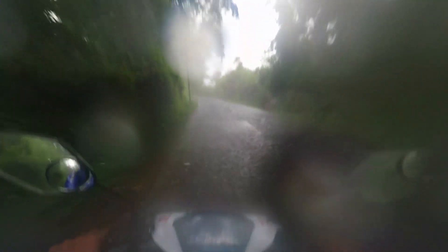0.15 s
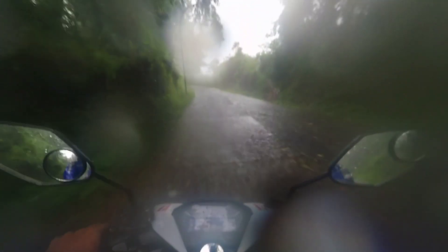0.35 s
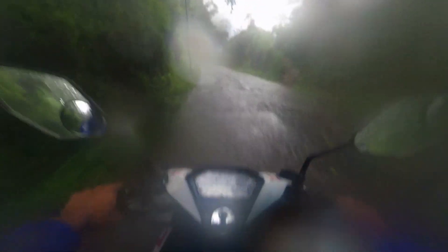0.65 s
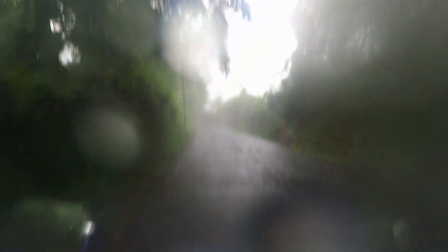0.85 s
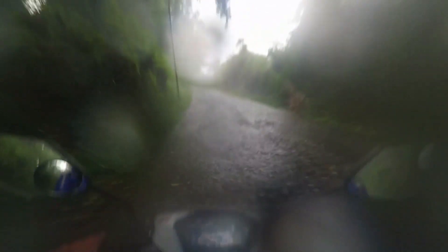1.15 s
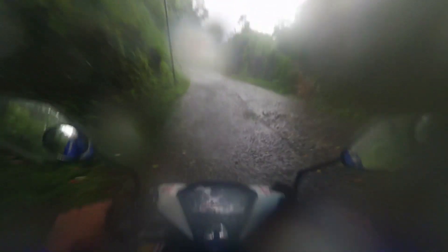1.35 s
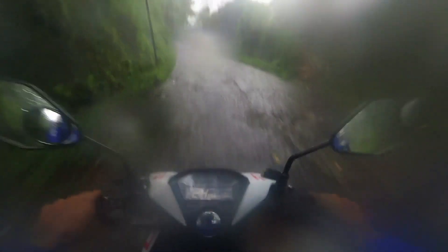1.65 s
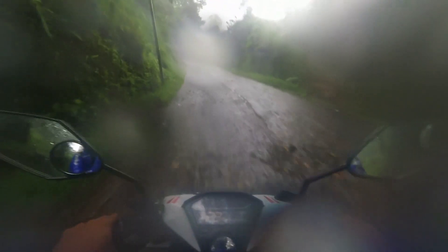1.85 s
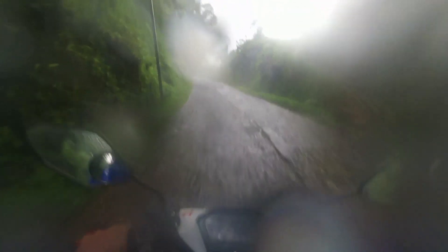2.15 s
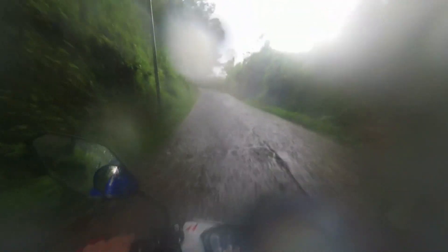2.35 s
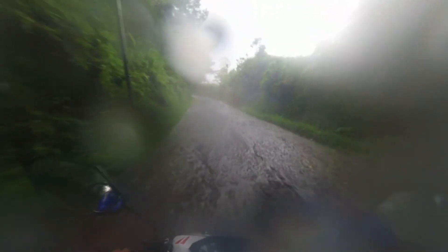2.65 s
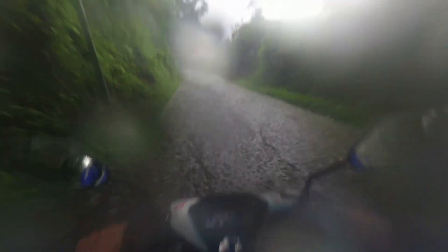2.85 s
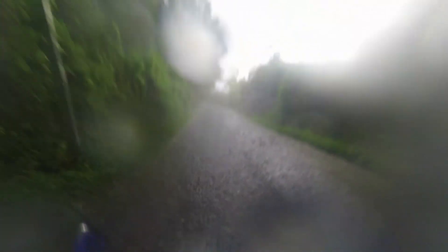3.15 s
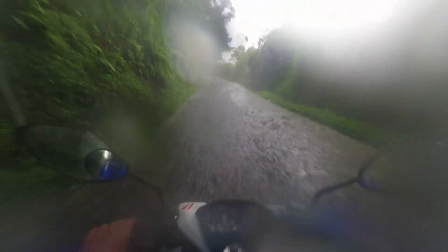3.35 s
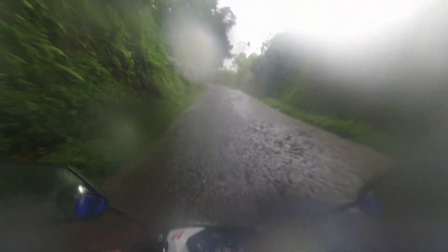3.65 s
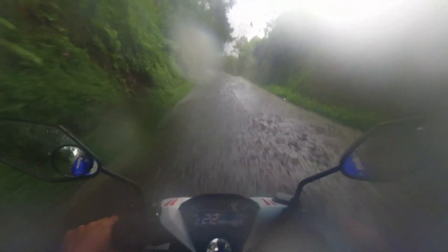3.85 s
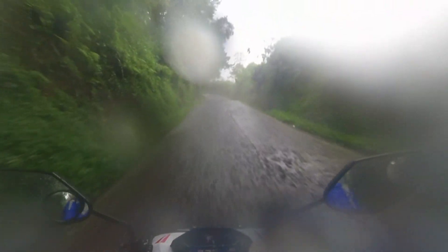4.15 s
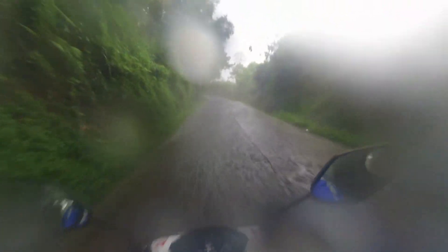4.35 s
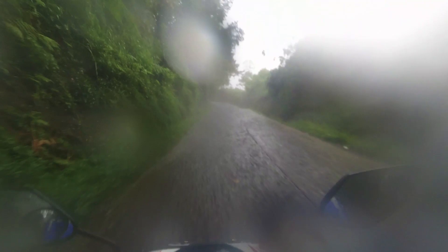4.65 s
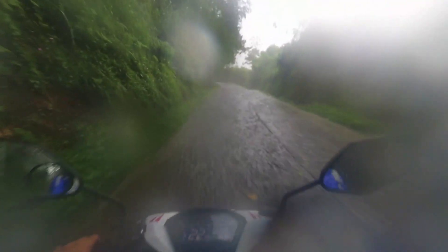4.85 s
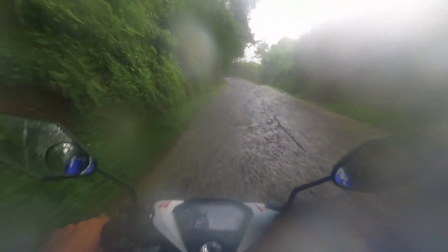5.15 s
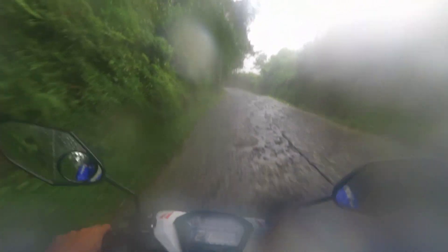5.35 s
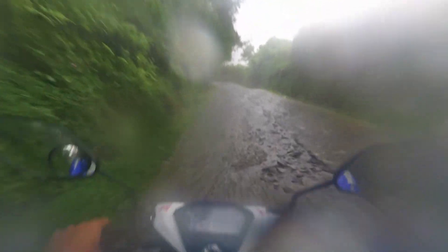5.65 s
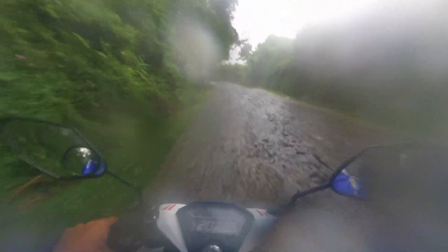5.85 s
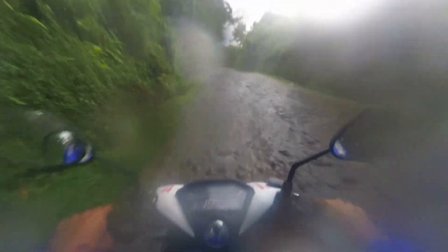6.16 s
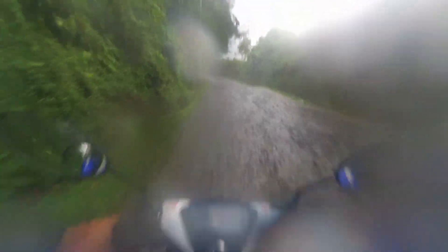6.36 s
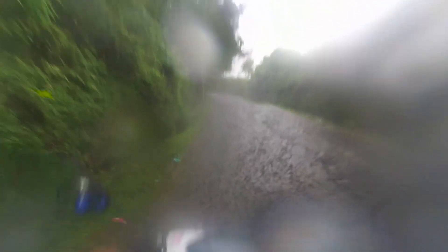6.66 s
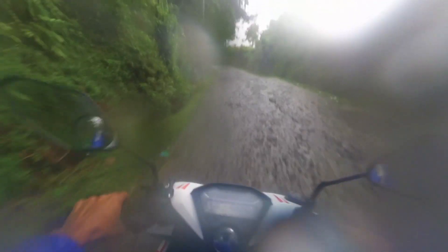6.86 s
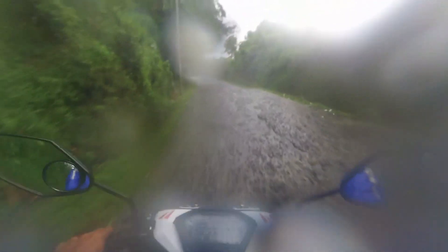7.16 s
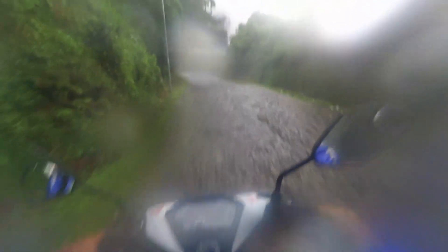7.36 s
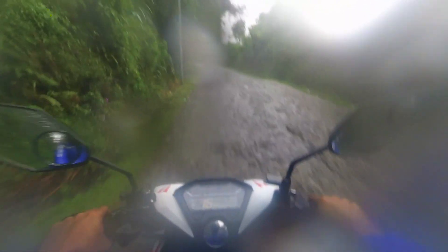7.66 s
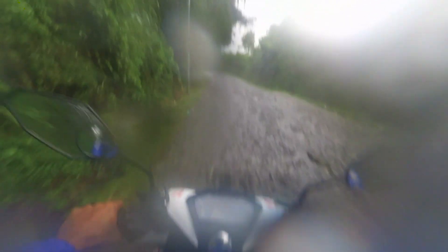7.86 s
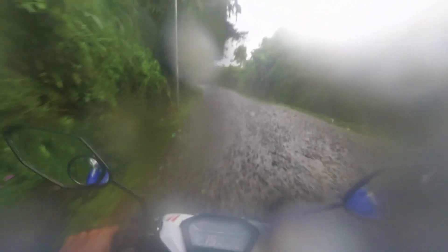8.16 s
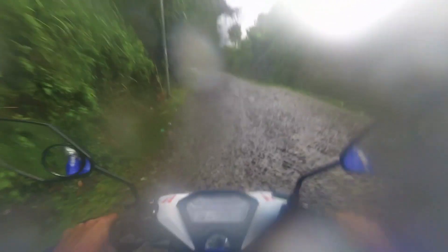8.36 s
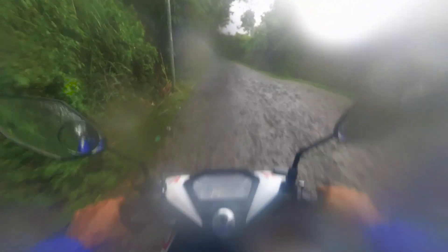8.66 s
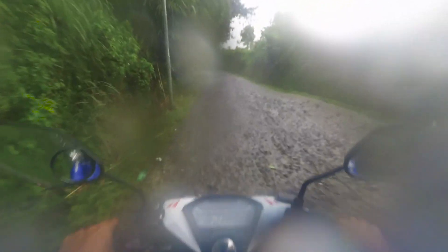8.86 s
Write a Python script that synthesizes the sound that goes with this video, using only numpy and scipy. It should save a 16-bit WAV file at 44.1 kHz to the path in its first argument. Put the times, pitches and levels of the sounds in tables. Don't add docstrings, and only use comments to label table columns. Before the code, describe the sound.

From 0 s a small single-cylinder motorcycle is already running, its low muffled exhaust thumping nearly thirty times a second, heard inside a sealed plastic housing in heavy rain. A sharp slap of water opens, then large drops crack and pop on the shell, clustered around 0.4-1.3 s, over fine ticking and thin spray hiss. Deep wind buffets swell around 1.2-1.9 s, with dull mount knocks at 1.9 and 2.1 s. Wind surges near 3-3.5 s, when the engine briefly ducks and recovers. Loud hollow drops strike around 4.4 s, a bump knocks at 4.8 s, and a busy cluster runs to 5.8 s. From about 6 s the engine beat gradually slows and deepens. Wind gusts and quick drops return at 7-7.6 s with soft bumps; the hiss thins, sparser drops continue, and a last low knock comes near 8.8 s as the engine sinks to about twenty-one beats a second.

```python
import sys
import numpy as np
from scipy import signal
from scipy.fft import rfft, irfft
from scipy.io import wavfile
from scipy.ndimage import uniform_filter1d, minimum_filter1d

SR = 44100
rng = np.random.default_rng(int(sys.argv[2]) if len(sys.argv) > 2 else 0)


def voltage_ratio(decibels):
    exponent = np.asarray(decibels, float) / 20
    return 10 ** exponent


def log_audio(samples):
    frames = np.atleast_2d(samples).T
    limited = np.clip(frames, -1, 1)
    pcm = np.round(limited * 32767).astype(np.int16)
    wavfile.write(sys.argv[1], SR, pcm)


N = 396900
TIME_S = np.arange(N) / SR


def unit_rms(x):
    return x / np.sqrt(np.mean(x ** 2) + 1e-20)


def read_spectrum(points, hz):
    point_hz, value = np.transpose(points)
    return np.interp(np.log(hz + 1), np.log(point_hz + 1), value)


def curves(rows):
    start_s, *columns = np.transpose(rows)
    return [np.interp(TIME_S, start_s, column) for column in columns]


def humps(rows):
    return sum(voltage_ratio(level_db) * np.exp(-(2 * (TIME_S - centre_s) / length_s) ** 2)
               for centre_s, length_s, level_db in rows)


def white():
    return rng.standard_normal(N)


def drift(hz):
    knots = rng.standard_normal(4000)
    return np.interp(TIME_S * hz, np.arange(4000), knots)


def coloured(x, points):
    gain = voltage_ratio(read_spectrum(points, np.fft.rfftfreq(len(x), 1 / SR)))
    return irfft(rfft(x) * gain, len(x))


def response(points, size=8192):
    level_db = read_spectrum(points, abs(np.fft.fftfreq(size, 1 / SR)))
    log_gain = np.log(voltage_ratio(np.maximum(level_db, -120)))
    return np.fft.ifft(np.exp(np.conj(signal.hilbert(log_gain)))).real[:size // 2]


def band(x, lo_hz, hi_hz):
    return signal.sosfilt(signal.butter(3, [lo_hz, hi_hz], "band", fs=SR, output="sos"), x)


def burst(noise, t60_s):
    return noise * voltage_ratio(-60 * np.arange(len(noise)) / SR / t60_s)


def add(mix, start_s, sound):
    part = mix[round(start_s * SR):][:len(sound)]
    part += sound[:len(part)]


# start_s, firing_hz, level_db
ENGINE = [(0.0, 29.07, -33.5), (0.2, 29.74, -31), (0.93, 29.32, -32), (1.23, 29.67, -31),
          (1.75, 27.94, -31), (3.1, 28.25, -32), (3.27, 29.13, -33.5), (3.52, 28.64, -36),
          (3.88, 29.78, -33), (4.99, 27.91, -30), (6.29, 26.96, -31), (6.47, 26.24, -31),
          (6.84, 26.2, -29.5), (7.09, 24.99, -31), (7.5, 24.82, -29), (8.0, 23.7, -31.5),
          (8.57, 22.91, -30.5), (9.0, 20.84, -34)]
ORDER_DB = [0, 0, 0, 0, -8, -16, -15, -17]
# freq_hz, gain_db
PIPE = [(25, -2.5), (48, -22), (58, -1), (74, -3), (90, 2.5), (115, 0), (127, -2.5), (146, -1), (200, -4.5)]


def engine():
    firing_hz, level_db = curves(ENGINE)
    turns = np.cumsum(firing_hz * (1 + 0.0052 * drift(12))) / SR + 0.303
    gains = [voltage_ratio(db + read_spectrum(PIPE, (k + 1) * firing_hz)) for k, db in enumerate(ORDER_DB)]
    thump = np.zeros(N)
    for k, gain in enumerate(gains):
        waver = voltage_ratio(1.54 * drift(9))
        thump += gain * waver * np.cos(2 * np.pi * (k + 1) * turns - 0.202 * k * k)
    lift_s, lift_length_s, lift_db = 3.49, 0.09, -12
    level_db = level_db + lift_db * np.exp(-(2 * (TIME_S - lift_s) / lift_length_s) ** 2)
    return voltage_ratio(level_db + 2.5) * thump / np.hypot(gains[2], gains[3]), turns


# freq_hz, density_db_per_hz
BUFFET = [(2, 0), (5, 1), (11, 6), (16, 9.5), (25, -7.5), (40, -16.5), (70, -20.5), (130, -22.5),
          (200, -89), (500, -140)]
# centre_s, length_s, level_db
SWELLS = [(.3, 0.75, -27.5), (.95, 0.12, -23), (1.25, 0.2, -17.5), (1.5, .11, -21), (1.8, 0.28, -18.5),
          (2.58, 0.39, -23), (3.05, .3, -25.5), (3.22, 0.091, -16.5), (3.5, 0.26, -12), (4.25, 1.15, -25),
          (5.02, 0.17, -22), (5.4, 0.39, -26), (5.79, 0.12, -18.5), (6.3, 0.27, -22), (6.68, 0.27, -22),
          (7.01, 0.19, -16), (7.31, 0.11, -20.5), (7.65, 0.58, -27), (8.25, 0.43, -24), (8.78, 0.29, -18)]
# freq_hz, density_db_per_hz
ROAR = [(88, -73), (150, -2), (275, -4.5), (434, -13), (650, -29.5), (840, -25), (1430, -120)]
# centre_s, length_s, level_db
SURGES = [
    (.9, .5, -52),
    (3.12, .15, -38),
    (3.39, 0.19, -39),
    (5.73, 0.25, -45),
    (6.61, 0.099, -45),
    (7.3, .1, -36.5),
]
# centre_s, length_s, level_db
GUSTS = [
    (1.205, 0.026, -32.5),
    (1.51, 0.07, -32),
    (3.14, 0.051, -42),
    (3.36, 0.073, -48),
    (7.38, 0.036, -36),
    (1.9, 0.046, -37),
    (4.14, .05, -41),
]


def wind(turns):
    calm_db, roar_db, roar_db_per_s, roar_follows = -32.5, -38, -0.3947, 0.095
    swell = voltage_ratio(calm_db) + humps(SWELLS)
    buffet = unit_rms(coloured(white(), BUFFET))
    buffet /= np.sqrt(uniform_filter1d(buffet ** 2, 9000) + 0.051)
    roar_level = voltage_ratio(roar_db + roar_db_per_s * TIME_S) * (swell / voltage_ratio(-25.5)) ** roar_follows
    roar_level = roar_level + humps(SURGES)
    throb = 1 + 0.43 * np.exp(-(turns % 1) / 0.079)
    roar = unit_rms(coloured(white() * throb * voltage_ratio(1.97 * drift(45)), ROAR))
    rattle = unit_rms(band(white(), 152, 460))
    return swell * unit_rms(buffet) + roar_level * roar + humps(GUSTS) * rattle


# start_s, level_db
SHOWER = [(0.0, -36.5), (0.2, -53), (0.32, -50), (0.8, -44), (1.48, -50), (2.4, -52), (2.76, -55),
          (3.28, -49), (4.09, -53), (4.59, -50), (5.34, -60), (5.54, -48), (5.71, -46), (5.91, -54),
          (6.47, -54), (7.42, -46.5), (7.6, -50.5), (9.0, -51)]
# freq_hz, density_db_per_hz
SPRAY = [(320, -52), (600, -8.5), (900, 2.5), (2150, 1.5), (2400, -25), (2650, -1), (3100, -4), (3900, 2),
         (5400, -12.5), (6800, -22), (8000, -17), (10000, -19.5), (14500, -24), (16000, -56)]
# freq_hz, density_db_per_hz
SHELL = [(290, -35), (600, 1), (1200, 4), (2050, 1), (3900, -6.5), (6500, -22.5), (9500, -18.5),
         (14000, -35), (16000, -30)]
# centre_s, length_s, level_db
SPLASHES = [
    (.011, 0.0062, -29.5),
    (0.487, .015, -37),
    (1.51, 0.09, -41),
    (3.415, 0.063, -45),
    (3.71, 0.046, -45),
    (7.43, 0.041, -54),
]


def spray(shower_db):
    level_db = -49.5 - 0.59 * TIME_S + 0.31 * (shower_db - shower_db.mean())
    flicker_db = 1.4 * drift(40) + 0.8 * drift(300)
    hiss = unit_rms(coloured(white() * voltage_ratio(flicker_db), SPRAY))
    gush = unit_rms(coloured(white() * voltage_ratio(8.9 * drift(250)), SHELL))
    return voltage_ratio(level_db) * hiss + humps(SPLASHES) * gush


def small_drops(shower_db):
    drops_per_s, patches = 200, 16
    size = voltage_ratio(6.6 * np.minimum(rng.exponential(1, N), 2.6)) * (rng.random(N) < drops_per_s / SR)
    patch = rng.integers(0, patches, N)
    shell = response(SHELL)[:600]
    ticks = np.zeros(N)
    for k in range(patches):
        tilt = [(500, 0), (16000, rng.uniform(-18, 14))]
        tick = np.convolve(burst(rng.standard_normal(900), 0.008), shell)
        ticks += signal.oaconvolve(size * (patch == k), unit_rms(coloured(tick, tilt)))[:N]
    return voltage_ratio(shower_db) * unit_rms(ticks)


def rain():
    shower_db, = curves(SHOWER)
    return spray(shower_db) + small_drops(shower_db)


def strike(noise, peak_db, ring_hz, splash_db, crack_db):
    t = np.arange(noise.shape[1]) / SR
    ring = np.sin(2 * np.pi * ring_hz * t) * voltage_ratio(-60 * t / 0.013)
    parts = [band(burst(noise[0], 0.014), 0.52 * ring_hz, 1.695 * ring_hz),
             band(burst(noise[3], 0.028), 602, np.clip(2 * ring_hz, 900, 2700)),
             band(burst(noise[1], 0.012), 1970, 4700),
             band(burst(noise[2], 0.0096), 7370, 12680)]
    knock, tail, splash, crack = (part / abs(part).max() for part in parts)
    body = 0.71 * ring + 0.54 * knock + 0.42 * tail
    return voltage_ratio(peak_db) * (body + voltage_ratio(splash_db - 1.55) * splash + voltage_ratio(crack_db) * crack)


# start_s, peak_db, sharpness_db
ON_BACK = [(1.9435, -9.5, -8.5), (1.996, -17, -14.5), (2.7624, -18.5, -4.5), (2.8516, -14, -14),
           (3.0589, -26, -9.5), (5.006, -18.5, -24), (5.0698, -18.5, -7.5), (7.003, -22.5, -10),
           (8.3108, -26.5, 1), (.704, -24, -6), (2.2664, -22.5, -12), (2.97, -26.5, -4), (6.8, -36, -2),
           (7.1147, -27, -6), (7.3883, -31, -1), (5.163, -24.5, -3.5), (4.53, -33, -4), (4.71, -38, 0.5),
           (5.376, -35, -3), (4.1, -39, 2), (4.851, -28, -8), (4.51, -33, -14)]
# start_s, peak_db, sharpness_db
ON_TOP = [(0.5794, -15.5, -5.5), (0.6639, -15.5, -2), (0.793, -22, -3), (1.2548, -22, -2),
          (1.3221, -20.5, -0.5), (2.1129, -15, 0), (2.5109, -24.5, -2.5), (2.9824, -29, 1.5),
          (4.3583, -22, 0), (4.7749, -23.5, -10.5), (5.16, -14, -10), (5.8151, -18.5, -16),
          (7.0843, -24, -1.5), (7.443, -20, 0), (8.7731, -23, 2.5), (0.611, -25.5, -10),
          (2.3017, -29, -3.5), (3.875, -31.5, 1.5), (4.9138, -26, -10), (7.0979, -29, -3),
          (7.5217, -28.5, -0.5), (7.602, -27, -4), (7.7984, -30, -3), (7.94, -31, -6)]
# start_s, peak_db, sharpness_db
ON_SIDE = [(0.6911, -28, 1), (1.5257, -25.5, -0.5), (2.151, -21.5, -6.5), (3.3543, -17, -16.5),
           (4.4139, -9.5, -14), (4.8804, -14.5, -10), (5.1145, -17, -1), (5.3228, -23, 5),
           (5.5962, -25, -2.5), (5.6262, -18.5, -4.5), (5.7986, -22.5, -10), (7.2826, -23.5, -13),
           (7.2963, -24.5, -13), (7.6096, -22, -6), (1.005, -27, -8), (1.0393, -28.5, -4),
           (1.0556, -30, -9), (1.2703, -22, -8), (1.3895, -23, -9), (2.8747, -29, -4), (4.6692, -29.5, -12),
           (6.154, -27.5, -22), (7.3754, -29, -3), (7.5424, -26, -7), (7.8634, -20, -11.5),
           (8.2878, -27.5, -6), (6.234, -30.5, -6), (6.383, -34, -3)]
# start_s, peak_db, sharpness_db
ON_DOOR = [(0.42, -12, 2), (0.45, -33.5, 5), (.9459, -27.5, 0), (1.1723, -26, -4), (4.2947, -24, -4.5),
           (6.014, -21, -3.5), (7.9275, -24.5, -10), (8.1149, -26, -14), (0.8753, -31, -4),
           (0.973, -30.5, -1), (3.1307, -26, -4), (3.6477, -27.5, -3), (4.1243, -25.5, -9),
           (4.5266, -24, -11), (7.2, -29, -10), (7.59, -29, -12), (8.5953, -34.5, -3), (8.8936, -31, -1),
           (7.703, -35, -12), (7.778, -35, 1), (3.3143, -34, -8), (5.29, -34.5, -5), (7.256, -32, -10),
           (7.195, -33, -12), (4.2, -35, -14), (4.97, -37, -14)]
# start_s, peak_db, sharpness_db
ON_RIM = [(.129, -18, -3.5), (.6708, -16, -6), (0.8849, -21, -6.5), (1.1838, -21, -0.5), (1.2181, -29, 0),
          (2.0868, -23, -12), (2.2476, -14, -7.5), (2.424, -24, 2.5), (3.4872, -13.5, -3),
          (3.5327, -22, -4.5), (3.6733, -22, -2), (4.0734, -20, -5.5), (4.5958, -22, -7),
          (4.8744, -18.5, -6.5), (4.9345, -23, 3), (4.9886, -22, -5.5), (5.7045, -20, 0.5),
          (6.7465, -16.5, -4.5), (6.7746, -30, 1), (.5693, -19.5, -21), (1.8742, -24.5, -15),
          (4.138, -29, -4), (5.5143, -28.5, -1.5), (5.5559, -29.5, 0), (5.6526, -31, -6), (5.7501, -32, -3),
          (7.173, -26.5, -5), (7.4333, -23.5, -10), (8.4554, -30.5, -1), (8.5429, -28, -18)]
# start_s, peak_db, sharpness_db
ON_LENS = [(0.036, -12, 4), (0.815, -24, -4), (1.288, -22.5, -3.5), (2.0943, -22, -1), (7.405, -29, 5),
           (1.2411, -32, -3), (2.8978, -32, 0.5), (5.772, -29, -1.5), (7.5664, -30.5, -2),
           (7.7618, -29.5, -3.5), (9.3, -34, -2), (8.7216, -30.5, -1), (6.8103, -35, 6), (8.336, -32, 0),
           (2.4, -45, 5), (4.3358, -41, 4), (6.9, -32, -4), (1.194, -32, -5), (6.9419, -37.5, 5),
           (4.1, -34, -2)]
PATCH_HZ = [
    870,
    1106,
    1217,
    1700,
    2044,
    2570,
]


def large_drops():
    out = np.zeros(N)
    for rows, ring_hz in zip([ON_BACK, ON_TOP, ON_SIDE, ON_DOOR, ON_RIM, ON_LENS], PATCH_HZ):
        for start_s, peak_db, sharpness_db in rows:
            noise = rng.standard_normal((4, 1500))
            crack_db = -8 + 1.28 * sharpness_db
            add(out, start_s, strike(noise, peak_db, ring_hz, sharpness_db, crack_db))
    return out


# start_s, peak_db, pitch_hz
KNOCKS = [
    (1.889, -14.5, 231),
    (2.11, -16.5, 460),
    (4.744, -19, 260.4),
    (4.772, -13.5, 272),
    (7.294, -20, 241.8),
    (7.624, -19.5, 349),
    (8.772, -19, 203.4),
]


def knocks():
    out = np.zeros(N)
    t = np.arange(1500) / SR
    for start_s, peak_db, pitch_hz in KNOCKS:
        add(out, start_s, voltage_ratio(peak_db - 60 * t / 0.014) * np.sin(2 * np.pi * pitch_hz * t))
    return out


def scene():
    thump, turns = engine()
    return (thump + wind(turns) + rain() + large_drops() + knocks())[None]


# from_hz, share_of_time
EMPTIED = [(11500, .03), (12800, .14), (14000, .32), (15200, .88), (16000, .97), (16550, 1), (23000, 1)]


def empty_weak_bands(x):
    hz, _, z = signal.stft(x, SR, nperseg=1024)
    for (lo_hz, share), (hi_hz, _) in zip(EMPTIED, EMPTIED[1:]):
        rows = (hz >= lo_hz) & (hz < hi_hz)
        power = (abs(z[rows]) ** 2).sum(0)
        power /= np.sqrt(minimum_filter1d(power, 40) + 1e-20)
        z[rows] *= power > np.quantile(power, share)
    return signal.istft(z, SR, nperseg=1024)[1][None, :N]


def top_cut(x):
    return signal.sosfilt(signal.butter(12, 16450, fs=SR, output="sos"), x)


def record(dry):
    mix = empty_weak_bands(dry[0])
    return top_cut(mix)


dry = scene()
out = record(dry)
log_audio(out)
```